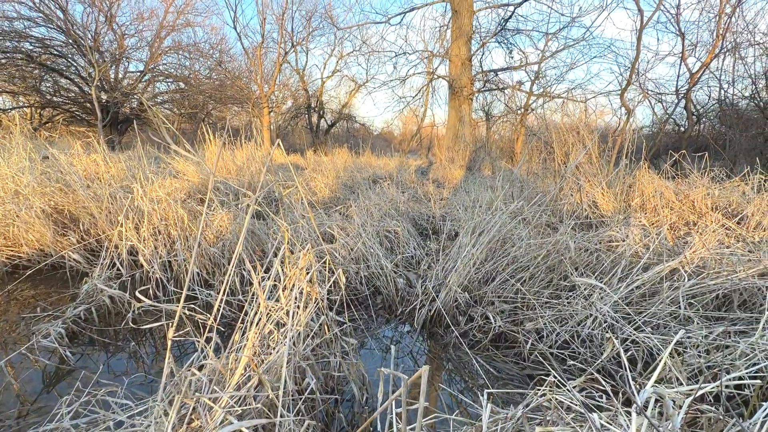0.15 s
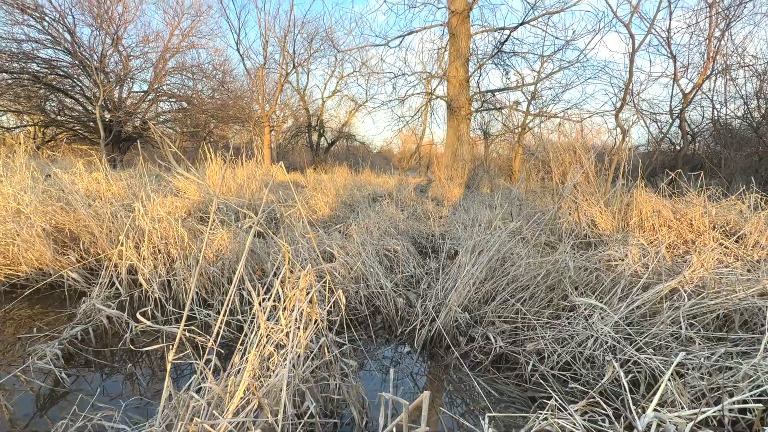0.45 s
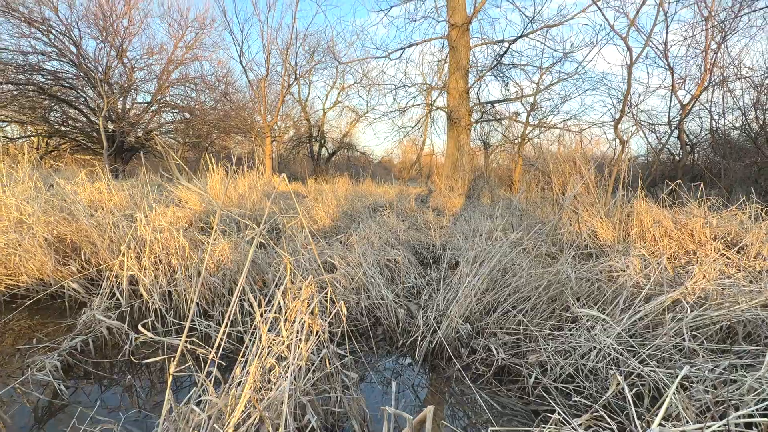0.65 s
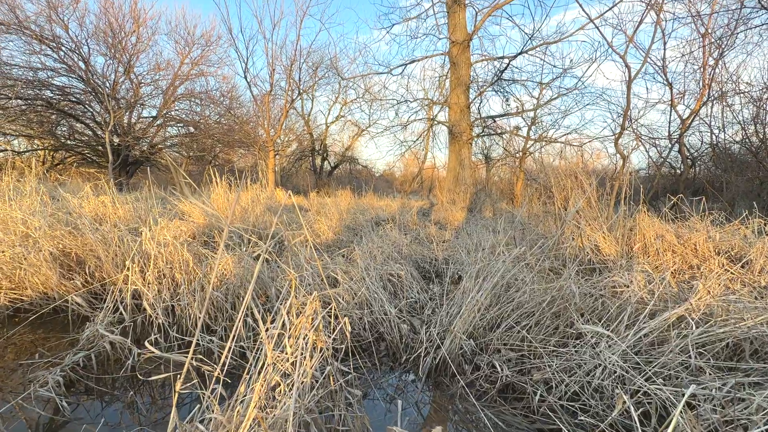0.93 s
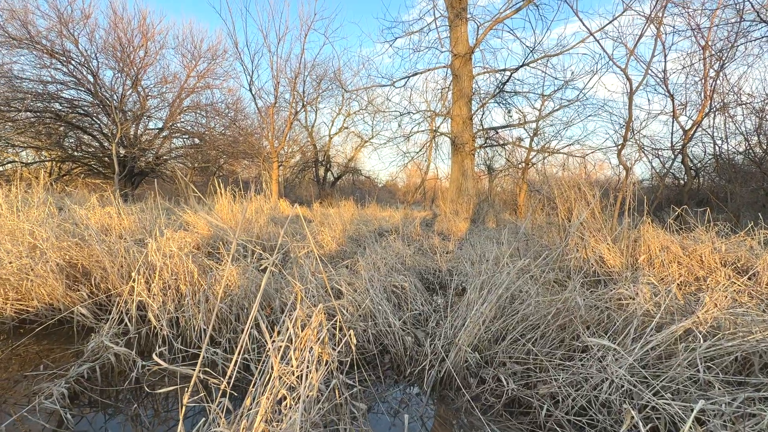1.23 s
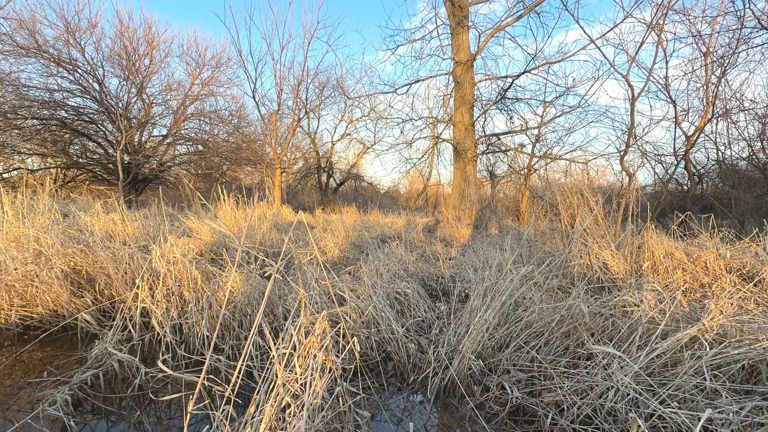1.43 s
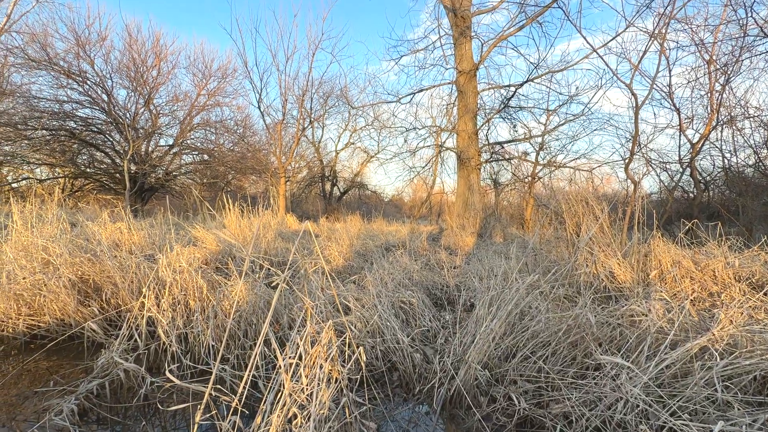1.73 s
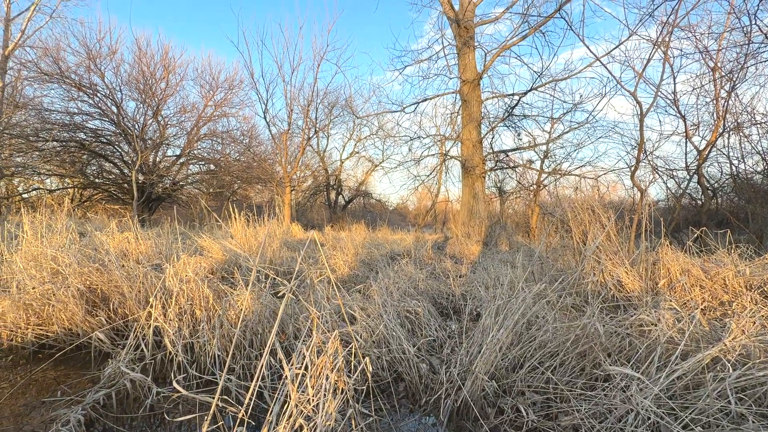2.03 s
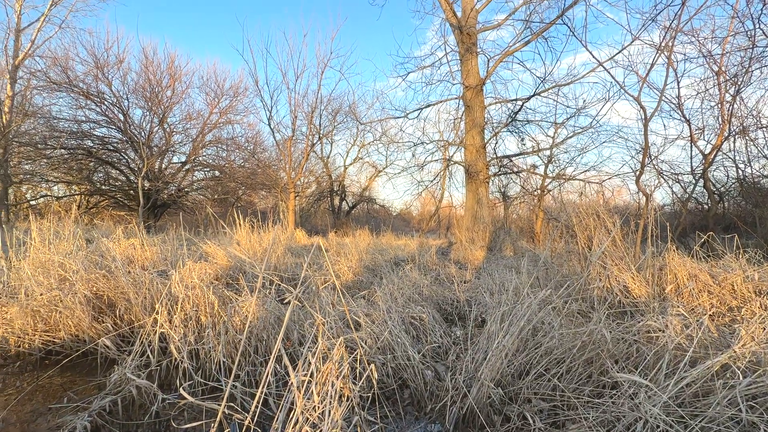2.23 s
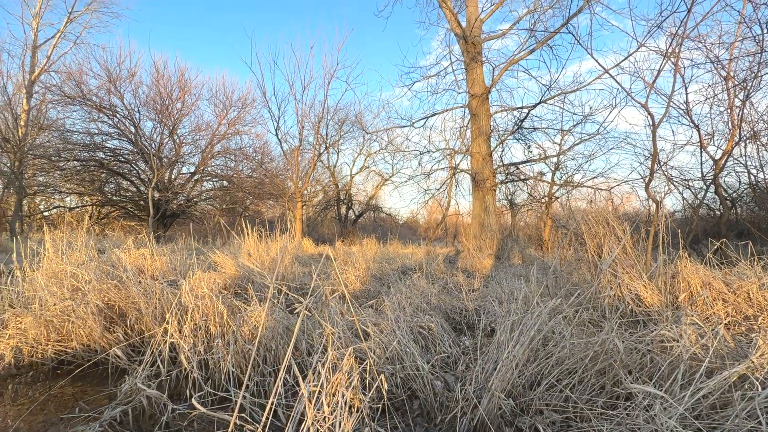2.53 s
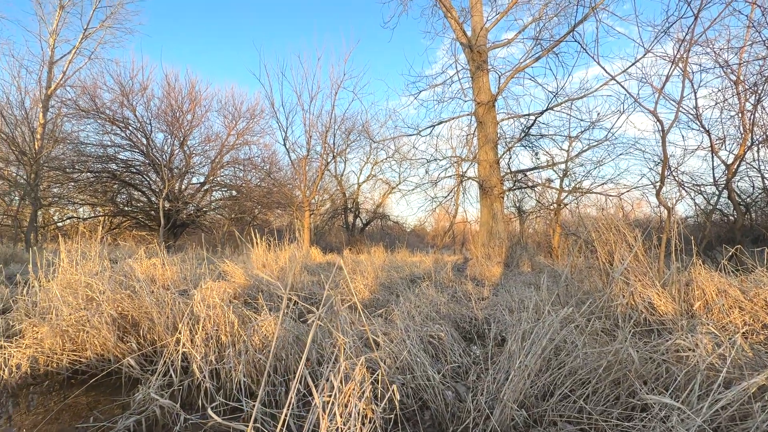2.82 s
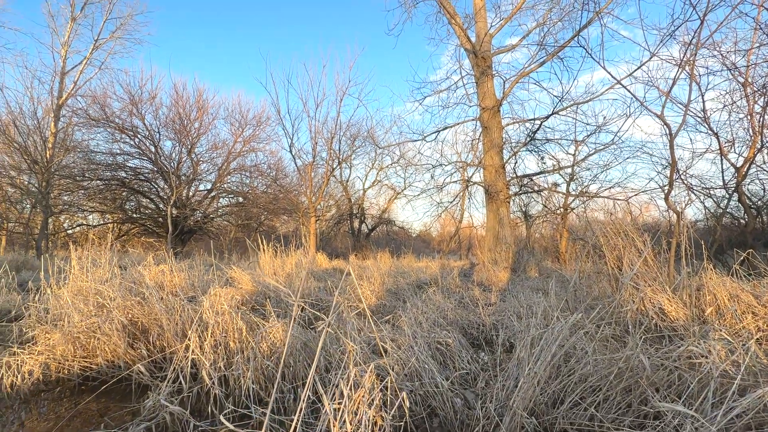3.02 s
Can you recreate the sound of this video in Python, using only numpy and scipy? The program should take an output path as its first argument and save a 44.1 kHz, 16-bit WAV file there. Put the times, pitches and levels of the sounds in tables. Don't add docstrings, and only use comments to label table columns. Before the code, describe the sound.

Chorus frogs creak in overlapping, rising rows of quick pulses, mostly left, in an open marsh. Handling cracks and rubbing sound close on the hand-held camera; later a small bird chips above low distant traffic.

```python
import sys
import numpy as np
from scipy import signal
from scipy.fft import rfft, irfft, next_fast_len
from scipy.io import wavfile
from scipy.ndimage import uniform_filter1d

SR = 44100
rng = np.random.default_rng(int(sys.argv[2]) if len(sys.argv) > 2 else 0)


def to_wav(s):
    ch = np.atleast_2d(s).T
    pcm = np.round(np.clip(ch, -1, 1) * 32767)
    wavfile.write(sys.argv[1], SR, pcm.astype(np.int16))


def linear_from_db(decibels):
    return 10 ** (np.asarray(decibels, float) / 20)


N = 139797
FAR_LAG_S = 0.0004837


def read(table, x, col=1, log=False):
    a = np.array(table, float)
    if log:
        return np.interp(np.log(np.maximum(x, 1)), np.log(a[:, 0]), a[:, col])
    return np.interp(x, a[:, 0], a[:, col])


def colour(x, table, lag_s=0., scale=0.79):
    size = next_fast_len(N)
    hz = np.arange(size // 2 + 1) * SR / size
    gain = linear_from_db(scale * read(table, hz, log=True))
    delay = np.exp(-2j * np.pi * hz * lag_s)
    return irfft(rfft(x, size) * gain * delay, size)[:N]


def unit(x):
    return x / np.sqrt(np.mean(x ** 2))


def walk(rate_hz):
    k = int(SR / rate_hz)
    steps = np.repeat(rng.standard_normal(N // k + 1), k)
    return 1.3 * uniform_filter1d(uniform_filter1d(steps, k), k)[:N]


def add(x, start_s, piece):
    i = int(round(start_s * SR))
    if 0 <= i < N:
        x[i:i + len(piece)] += piece[:N - i]


def echo(x, time_s):
    t = np.arange(int(.25 * SR)) / SR
    tail = rng.standard_normal(len(t)) * np.exp(-t / time_s) * (1 - np.exp(-t / 0.00084))
    return signal.fftconvolve(x, tail / np.sqrt(np.sum(tail ** 2)))[:N]


def ports(x, lag_s):
    return np.array([x, colour(x, [(1, 0), (2, 0)], lag_s)])


def pan(left_over_right_db):
    return linear_from_db(left_over_right_db * np.array([[.5], [-.5]]))


# [Hz, dB]
SHADOW = [(60, -.5), (380, -2.5), (700, 2), (1300, 5.5), (2400, 1.5), (4400, 10.5), (7500, 21.5), (9800, 4),
          (12000, -2.5)]
# [Hz, 0 to 1]
ALIKE = [(60, 0.77), (250, 0.67), (600, 0.36), (1500, 0.37), (12000, 0.15)]


def bed(table, lag_s):
    size, out = next_fast_len(N), 0
    hz = np.arange(size // 2 + 1) * SR / size
    gain = linear_from_db(read(table, hz, log=True))
    a, b = (rfft(rng.standard_normal(size)) * gain for _ in range(2))
    share = np.clip(read(ALIKE, hz, log=True), 0, 1)
    side_db = read(SHADOW, hz, log=True) / 2
    left = a * linear_from_db(side_db)
    right = (share * a + np.sqrt(1 - share ** 2) * b) * linear_from_db(-side_db)
    pair = np.array([left, right * np.exp(-2j * np.pi * hz * lag_s)])
    for octave in range(4, 15):
        band = np.clip(1 - abs(np.log2(hz + 1) - octave), 0, 1)
        flicker_db = .9 * walk(5.7)
        out = out + irfft(pair * band, size)[:, :N] * linear_from_db(flicker_db)
    return unit(out)


# [s, dB, dB]
TRAFFIC = [
    (0, -46, -60.5),
    (.38, -47, -60),
    (.5, -41.5, -57),
    (.9, -46.5, -56.5),
    (1.3, -46.5, -57.5),
    (1.75, -49.5, -56),
    (2.1, -46.5, -56.5),
    (2.5, -49, -58.5),
    (3.17, -47.5, -59),
]
# [Hz, dB per Hz]
HUM = [(20, -29), (31, -21), (48, 1.5), (65, 0), (222, -6), (310, -10.5), (393, -31.5), (600, -67)]
# [Hz, dB per Hz]
ROAR = [(350, -1), (550, -2), (1000, 4), (1500, 0), (2100, -10.5), (3600, -19), (5000, -21), (7000, -27.5)]


def traffic(t):
    hum = bed(HUM, 0.000067) * linear_from_db(read(TRAFFIC, t) + 1.0)
    roar_shape = [(100, -79)] + list(ROAR) + [(12000, -42)]
    roar = bed(roar_shape, FAR_LAG_S) * linear_from_db(read(TRAFFIC, t, col=2) + 4.0)
    return hum + roar


# [Hz, dB per Hz]
AIR = [(3500, -12), (5500, 17.5), (7500, -2), (9800, 8.5), (10600, -27), (12000, -32), (12900, -20),
       (16000, -12)]


def marsh_air():
    return bed([(1500, -53)] + list(AIR), FAR_LAG_S) * linear_from_db(-77.5)


# [s, s, Hz, dB]
CHIPS = [
    (1.804, 0.037, 5420, -65),
    (1.92, 0.039, 5340, -67),
    (2.086, 0.038, 5430, -61.5),
    (2.239, 0.046, 5740, -63),
    (2.377, 0.048, 5700, -64.5),
    (2.547, 0.034, 5800, -61.5),
    (2.722, 0.038, 5620, -68),
    (2.868, 0.028, 5830, -60),
]


def bird():
    droop, overtone_db, echo_db = .16, -10, -7
    x = np.zeros(N)
    for start_s, length_s, top_hz, db in CHIPS:
        u = np.linspace(-1, 1, int(length_s * SR))
        hz = top_hz * (1 - droop * abs(u + 0.11) ** 3)
        turn = 2 * np.pi * np.cumsum(hz) / SR
        voice = np.sin(turn) + linear_from_db(overtone_db) * np.sin(1.5 * turn)
        add(x, start_s, linear_from_db(db) * np.sqrt(1 - u ** 8) * voice)
    x = x * linear_from_db(2.5 * walk(400))
    wet = linear_from_db(echo_db) * np.array([echo(x, 0.029), echo(x, 0.07)])
    return (ports(x, FAR_LAG_S) + wet) * pan(6)


# [s, dB, dB]
CRACKS = [(0.453, -41.5, -9), (0.5087, -39, -19), (0.565, -40.5, -8), (0.8127, -50, -7), (1.1144, -48, -2),
          (1.1363, -68, 19), (1.4815, -37.5, -21), (1.504, -34.5, -10), (1.5465, -38, -11.5),
          (1.62, -33.5, -22), (1.71, -36, -17), (1.9186, -28.5, -28), (1.9457, -37, -12.5),
          (1.9857, -31, -13), (2.164, -43.5, -16), (2.1826, -67.5, 19.5), (2.3308, -49.5, -5),
          (2.8153, -30.5, -15), (2.829, -28.5, -15), (3.071, -50.5, 2.5), (3.1548, -36, -17)]
# [s, dB]
TICKS = [(0.427, -55), (0.4793, -59), (0.5362, -68), (0.5914, -78), (0.6205, -73), (0.7163, -63),
         (0.792, -61), (0.849, -48), (0.8914, -65), (0.9153, -57), (1.0165, -52), (1.067, -59),
         (1.185, -56), (1.3149, -54), (1.3414, -68), (1.4267, -55), (1.5214, -40), (1.637, -45),
         (1.752, -48), (1.78, -45), (1.8307, -52), (1.863, -48), (1.966, -60), (2.0348, -56), (2.0762, -54),
         (2.155, -63), (2.2812, -71), (2.3007, -66), (2.3885, -63), (2.4478, -62), (2.4867, -62),
         (2.5112, -69), (2.6604, -75), (2.7048, -65), (2.7174, -75), (2.7791, -82), (2.7791, -65),
         (2.8599, -61), (2.8973, -66), (2.9248, -59), (2.9781, -62), (2.9931, -51), (3.0515, -56),
         (3.1243, -55)]


def cracks():
    snap_s, shiver_s, shiver_db = .0008, .005, -14
    high, low, u = np.zeros(N), np.zeros(N), np.arange(1200) / SR
    fade = (1 - np.exp(-u / 0.0036)) * np.exp(-u / snap_s) + linear_from_db(shiver_db) * np.exp(-u / shiver_s)
    ticks = [(start_s - .001, db + 7.5, -17.5) for start_s, db in TICKS]
    for start_s, db, low_db in list(CRACKS) + ticks:
        bright, dull = rng.standard_normal((2, len(u))) * fade
        add(high, start_s, linear_from_db(db + 1) * bright)
        add(low, start_s, linear_from_db(db + low_db + 3) * dull)
    return high, low


# [s, s, dB]
GRIP = [(0.43, 0.098, -66), (0.79, 0.29, -66.5), (1.282, 0.087, -72.5), (1.43, 0.17, -68),
        (1.615, 0.082, -60), (1.7, 0.19, -67.5), (1.915, 0.14, -61.5), (.42, 1.7, -90), (2.1, 1.2, -94),
        (2.825, 0.06, -83), (3.04, 0.057, -73), (3.124, .06, -69.5)]


def rubbing(t):
    grains_per_s, grain_s = 470, .0006
    grip = 0
    for start_s, length_s, db in GRIP:
        inside_s = np.minimum(t - start_s, start_s + length_s - t)
        grip = grip + linear_from_db(db) * np.clip(inside_s / 0.022 + .5, 0, 1)
    scatter_db = -1.5 * np.minimum(rng.exponential(size=N), 2.5)
    slips = (rng.random(N) < grains_per_s / SR) * linear_from_db(scatter_db)
    smear = signal.lfilter([1], [1, -np.exp(-1 / (grain_s * SR))], slips) + .25
    return unit(smear * rng.standard_normal(N)) * grip * linear_from_db(-2.5 + 3.5 * walk(30))


# [Hz, dB]
BODY_HIGH = [(6500, -47), (8500, -9.5), (9900, 1), (11300, -4), (12600, -4), (14000, 2), (15700, 4)]
# [Hz, dB]
BODY_LOW = [(2000, -22), (4000, -1), (6000, 2.5), (8000, -12), (10000, -15.5), (12000, -18)]


def handling(t):
    lag_s = -0.00013
    high, low = cracks()
    rub = rubbing(t)
    ring = colour(high + 1.33 * rub, BODY_HIGH)
    dull = colour(low * 3.7 + linear_from_db(6) * rub, BODY_LOW)
    return ports(ring, lag_s) + ports(dull, lag_s) * pan(6)


# [times the pitch, dB]
PARTIALS = [(.5, -19.5), (1, -3.5), (1.5, -29)]


def pulse(hz, db, phase, peak_s=0.0024, partials=PARTIALS):
    t = np.arange(int(.016 * SR)) / SR
    turn = 2 * np.pi * hz * (t + 0.021 * t ** 2 / 0.018) + phase
    shape = (t / peak_s * np.exp(1 - t / peak_s)) ** 2
    return linear_from_db(db) * shape * sum(linear_from_db(p_db) * np.sin(m * turn) for m, p_db in partials)


# [s, s, Hz, Hz, dB]
GROUPS = [
    (-.45, 0.96, 2750, 3070, -53.5),
    (0.201, 1.234, 2850, 3132, -53),
    (0.602, 0.57, 2610, 2877, -58),
    (0.808, 1.25, 2870, 3295, -56.5),
    (1.504, 1.1, 2712, 3056, -54),
    (2.062, 1.17, 2816, 3283, -54.5),
    (2.559, 1, 2840, 2750, -55),
]


def far_frogs(count=9):
    first_gap_s, last_gap_s, spread_s, spread_hz, spread_db = .04, .058, .025, 130, 1.5
    far = np.zeros((2, N))
    for start_s, length_s, first_hz, last_hz, db in GROUPS:
        for k, (own_gap, own_hz, own_db) in enumerate(rng.standard_normal((count, 3))):
            s = 0
            for jitter, pitch, loudness in rng.standard_normal((60, 3)):
                part = s / length_s
                if part < 1:
                    hz = first_hz + (last_hz - first_hz) * part + spread_hz * np.tanh(own_hz) + 20 * pitch
                    swell_db = 6 * np.log10(min(part / 0.19, 1) + 0.0057)
                    level_db = db + spread_db * own_db + swell_db + 2.76 * loudness
                    add(far[k % 2], start_s + spread_s * (k - 4) + s, pulse(hz, level_db, 6 * jitter))
                gap_s = first_gap_s + (last_gap_s - first_gap_s) * part
                s += gap_s * (1 + .05 * own_gap + .02 * jitter)
    return far


# [s, dB, Hz]
EARLY_PULSES = [(0.164, -48, 2695), (0.44, -41, 2780), (0.4957, -40, 2730), (0.6547, -43.5, 3070),
                (0.7404, -42, 2970), (0.7907, -47, 3050), (0.8138, -41, 2990), (0.837, -48, 3280),
                (0.908, -56, 3000), (0.948, -51, 3200), (0.982, -47, 3060), (1.043, -51, 3010),
                (.6802, -40.5, 3050), (.8853, -47, 2880), (1.023, -51, 2840), (1.0803, -45, 3100),
                (1.1177, -52, 3240), (1.1382, -52, 3250), (.612, -45, 2860), (.36, -59, 3250)]
# [s, dB, Hz]
MIDDLE_PULSES = [(1.1833, -46, 3080), (1.2429, -41, 3100), (1.3177, -51, 3060), (1.3562, -46, 3110),
                 (1.298, -47.5, 2950), (1.486, -46.5, 3100), (1.4185, -43, 3070), (1.4702, -48, 3190),
                 (1.5198, -52, 3340), (1.5726, -41.5, 3120), (1.6203, -42.5, 3210), (1.689, -42.5, 3080),
                 (1.7481, -43.5, 3280), (1.7813, -48, 3190), (1.8142, -43, 3170), (1.8777, -46, 3330),
                 (1.9906, -44.5, 2860)]
# [s, dB, Hz]
LATE_PULSES = [(2.109, -46.5, 2860), (2.1323, -53, 2670), (2.1824, -47.5, 2760), (2.2028, -47, 3040),
               (2.229, -46, 2930), (2.265, -51, 2840), (2.3097, -56, 2970), (2.353, -53, 3110),
               (2.3984, -48.5, 2880), (2.4478, -54, 3020), (2.4962, -48, 2870), (2.5441, -50, 3200),
               (2.592, -50, 3000), (2.6343, -45, 3180), (2.674, -47, 2960)]
# [s, s, s, Hz, dB]
SOLOS = [
    (0.024, .15, 0.058, 3296, -46),
    (0.221, .74, 0.0395, 2630, -45),
    (2.801, 3.17, .0495, 2650, -49.5),
    (2.932, 3.17, 0.057, 3380, -52),
]
# [s, dB, Hz]
SNAPS = [(0.4389, -65, 4290), (0.4663, -64, 4300), (0.4973, -70, 4370), (0.5162, -60, 4500),
         (0.622, -61, 4480), (0.6818, -62, 4440), (0.7267, -65, 4460), (1.2416, -66, 4420),
         (1.3733, -70, 4500), (2.0877, -66, 4260), (2.136, -62, 4400), (2.2024, -63, 4590),
         (2.2638, -60, 4520), (2.31, -59, 4330), (2.355, -61, 4370), (2.4019, -61, 4430), (2.45, -58, 4320),
         (2.4798, -63, 4400), (2.4977, -65, 4340), (2.5257, -67, 4430), (2.544, -62, 4600),
         (2.5721, -65, 4500), (2.591, -58, 4100), (2.6194, -76, 4470), (2.6339, -64, 4330),
         (2.6683, -61, 4610), (2.72, -63, 4520), (2.7576, -61, 4570), (2.8679, -59, 4480)]


def near_frogs():
    slowing, rise_hz_per_s, swell_db_per_s = .011, 400, 7
    near, n = np.zeros(N), np.arange(14)
    rows = list(EARLY_PULSES) + list(MIDDLE_PULSES) + list(LATE_PULSES)
    for start_s, end_s, gap_s, hz, db in SOLOS:
        for s in gap_s * n * (1 + slowing * (n - 1) / 2):
            if start_s + s < end_s:
                rows.append((start_s + s, db + swell_db_per_s * s, hz + rise_hz_per_s * s))
    for (start_s, db, hz), phase in zip(rows, 2 * np.pi * rng.random(100)):
        add(near, start_s - .001, pulse(hz, db + 2.5, phase))
    for start_s, db, hz in SNAPS:
        add(near, start_s - .001, pulse(hz, db + 1, 0, .0011, [(0.97, 0)]))
    return near


# [s, dB]
FACING = [
    (0, 9.5),
    (.4, 9),
    (.9, 13.5),
    (1.3, 15.5),
    (1.7, 14.5),
    (2.1, 13.5),
    (3.17, 9),
]


def frogs(t):
    near, far = near_frogs(), far_frogs()
    both = near + far.sum(0)
    direct = ports(near + far[0], FAR_LAG_S) + ports(far[1], 0.48 * FAR_LAG_S)
    wet = linear_from_db(-4.5) * np.array([echo(both, .025), echo(both, .025)])
    side_db = read(FACING, t)
    return direct * pan(side_db) + wet * pan(.4 * side_db)


def scene():
    t = np.arange(N) / SR
    return traffic(t) + marsh_air() + bird() + handling(t) + frogs(t)


def band_limit(x):
    return signal.sosfilt(signal.butter(12, 16480, fs=SR, output="sos"), x)


def record(dry):
    top_cut = signal.ellip(10, .2, 70, 15720, fs=SR, output="sos")
    return band_limit(signal.sosfilt(top_cut, dry))


dry = scene()
out = record(dry)
to_wav(out)
```